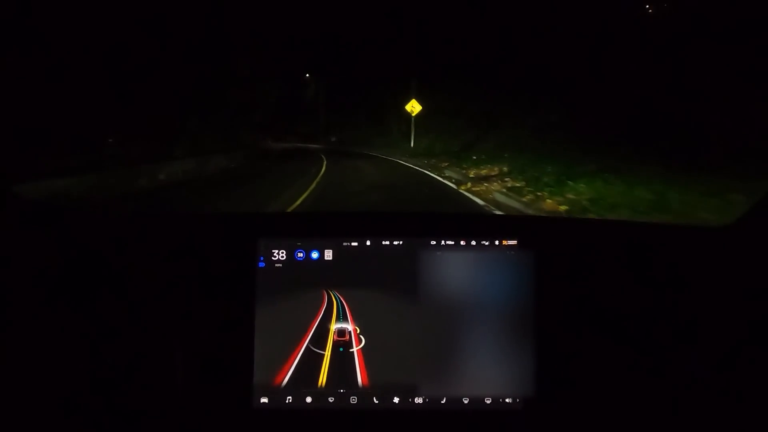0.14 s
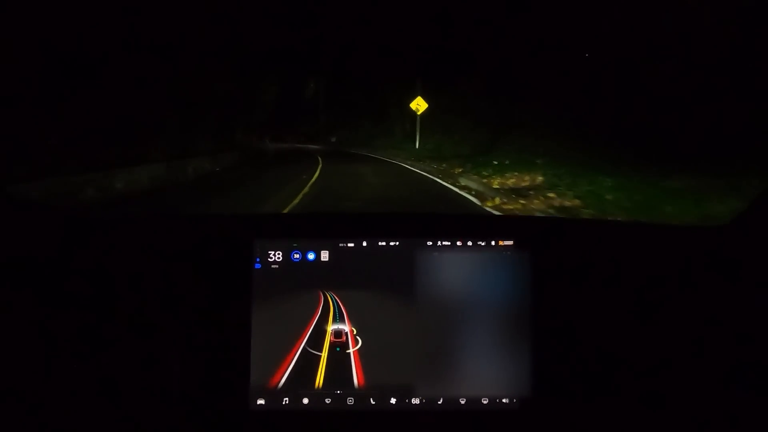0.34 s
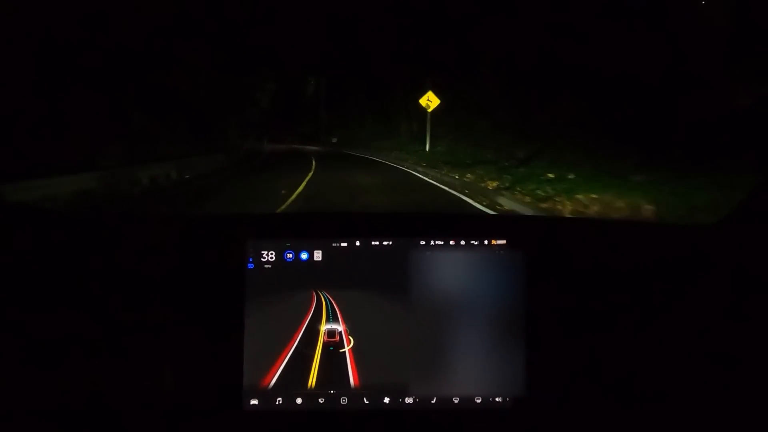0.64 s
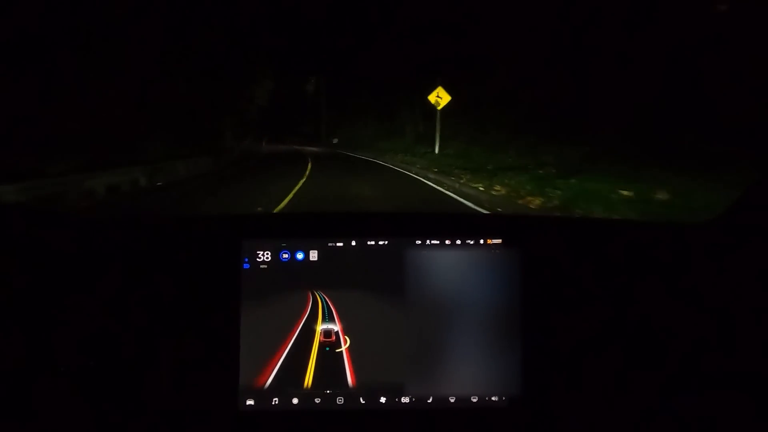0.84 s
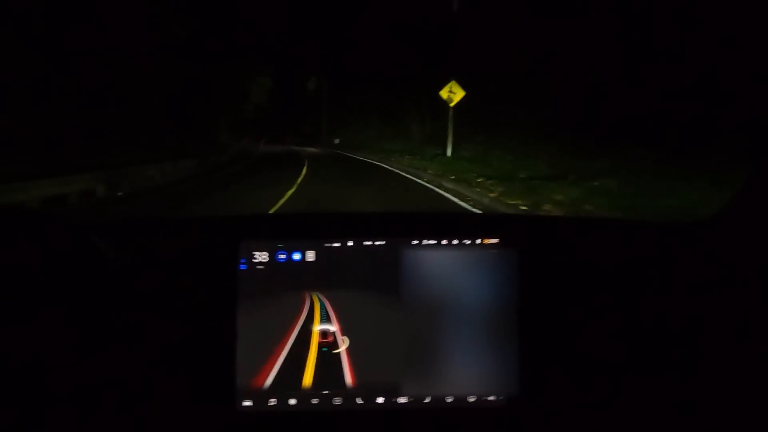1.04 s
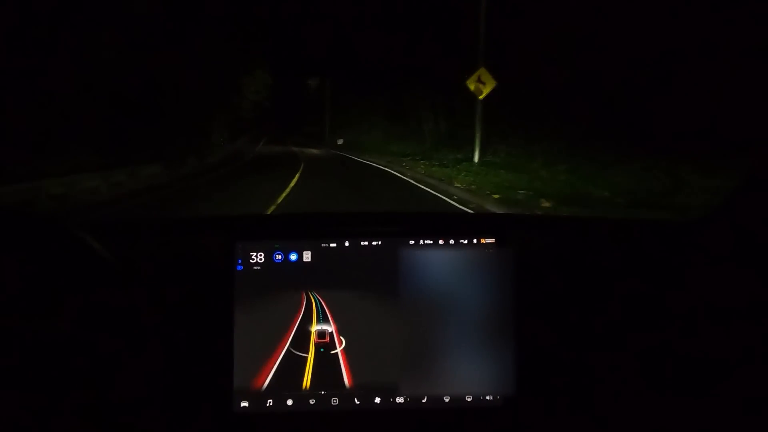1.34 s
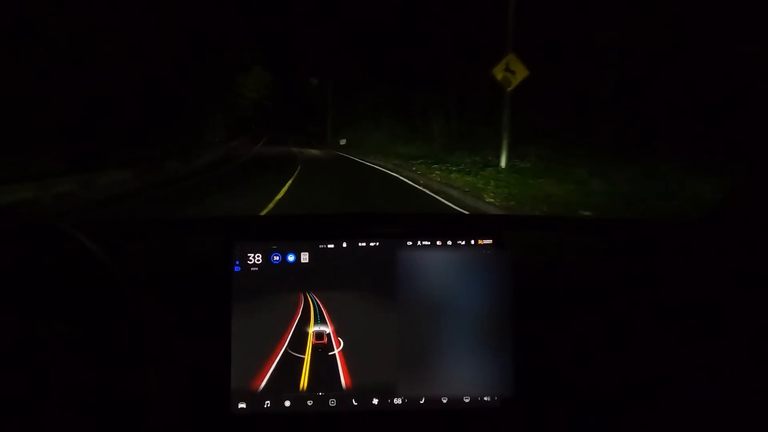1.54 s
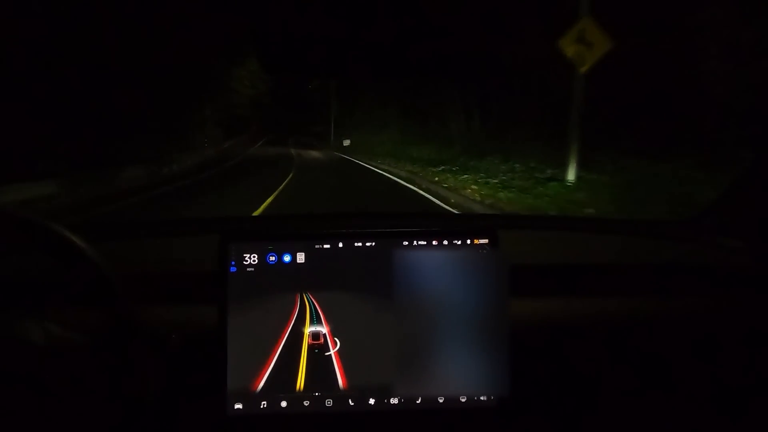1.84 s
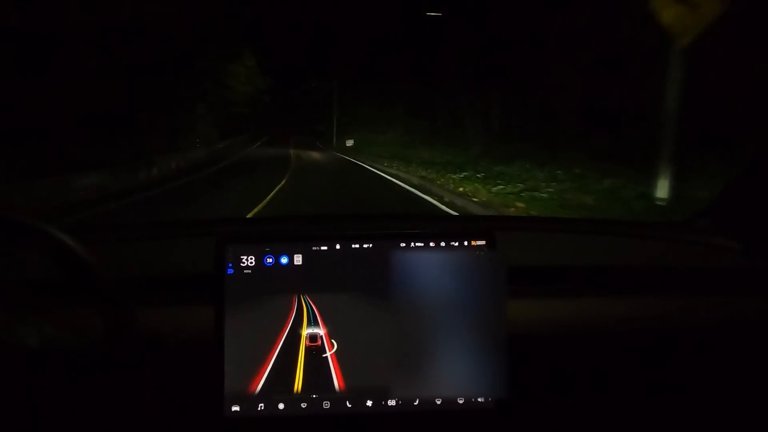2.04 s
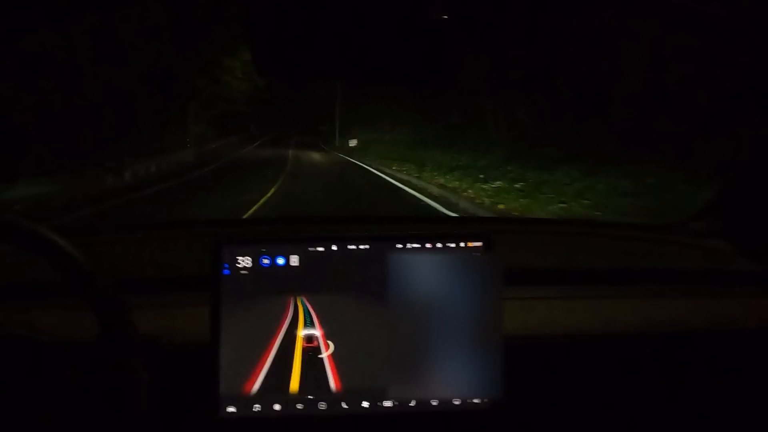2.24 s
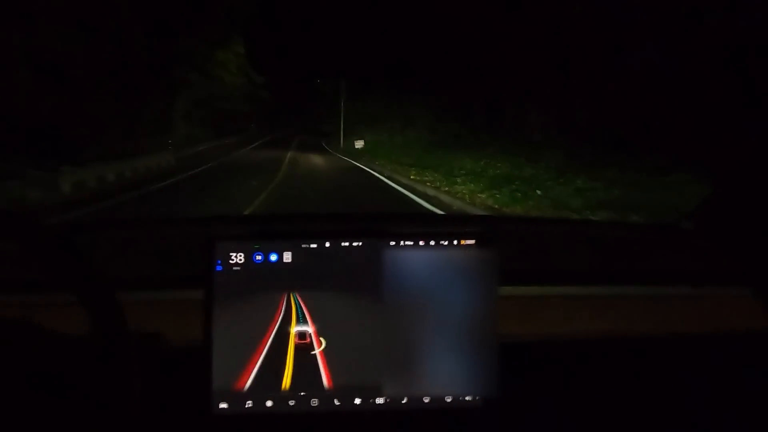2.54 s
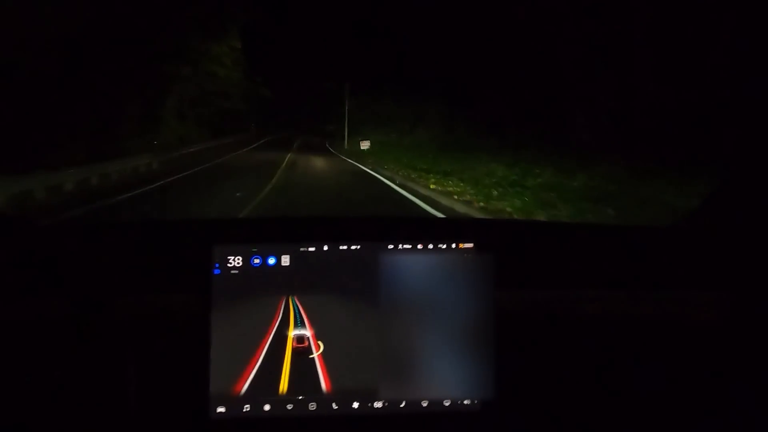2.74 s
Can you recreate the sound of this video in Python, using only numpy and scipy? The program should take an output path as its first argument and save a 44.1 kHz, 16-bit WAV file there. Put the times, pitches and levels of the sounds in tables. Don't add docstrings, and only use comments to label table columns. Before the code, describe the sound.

Continuous low tyre and road rumble inside a quiet electric car, dark and boomy, with a barely audible motor tone and faint airy hiss. Around 1.1 to 1.3 s, grit and wet leaves spit sharply into the wheel arch, and the rumble then dips. Bumps boom again near 2.2 s; from 2.4 to 2.65 s a stronger gritty rattle peaks with a heavy hollow knock at 2.57 s, then subdued rumble.

```python
import sys
import numpy as np
from scipy import signal
from scipy.fft import rfft, irfft
from scipy.io import wavfile
from scipy.ndimage import uniform_filter1d, minimum_filter1d

SR = 44100
rng = np.random.default_rng(int(sys.argv[2]) if len(sys.argv) > 2 else 0)


def master(y):
    cut = np.clip(np.atleast_2d(y).T, -1, 1)
    pcm = np.round(cut * 32767)
    wavfile.write(sys.argv[1], SR, pcm.astype(np.int16))


def invert_db(x):
    u = np.asarray(x, float) / 20
    return 10 ** u


N = 127890

# time in seconds, gain in dB.
ROAD_GAIN = [(0, 1.5), (.9, 1), (1.15, 1.5), (1.3, -2), (1.5, -5.5), (1.85, -4), (2.249, -1.5), (2.45, -1),
             (2.62, -7), (2.75, -7), (2.9, -6.5)]
# time in seconds, rumble lift in dB.
RUMBLE_LIFT = [(0, 1), (.15, -1.5), (.4, -2), (.55, 0.5), (.75, -0.5), (.9, 0), (1.05, -1.5), (1.2, -0.5),
               (1.35, -3.5), (1.65, 1), (1.9, -0.5), (2.15, 0), (2.351, -1), (2.72, 2), (2.9, -3)]
# frequency in Hz, density in dB per Hz.
RUMBLE = [(7.1, -28.5), (12, -4.5), (32, 5), (118, -3.5), (151, -10.5), (184, -9.5), (231, -15), (375, -24),
          (450, -28), (580, -66.5), (990, -120)]
# frequency in Hz, density in dB per Hz.
ROAR = [(400, 2), (620, -13), (1100, -12), (1970, -30.5), (3500, -40.5), (7400, -55.5), (8300, -74),
        (15000, -85.5)]
RUMBLE_DB, ROAR_DB = -18.5, -43.5
# centre in Hz, width in Hz, lift in dB.
CABIN_MODES = [(52, 3.9, 0), (74, 10, 1.5), (109.7, 10, -0.5), (119.7, 16, 3.5), (183.4, 11, 5),
               (202.8, 18, 5.5), (256, 24, 3.5), (299, 14, 3), (382, 24, 8), (579.8, 26, 9), (764, 44, 9),
               (992, 8.8, 10.5), (1070, 30, 0.5), (1250, 29, 3)]
# centre in seconds, length in seconds, pitch in Hz, level in dB.
SHAKES = [(0.1447, 0.68, 33, -21), (0.55, .4, 27.4, -20), (0.99, 0.45, 33.3, -21), (1.04, 0.21, 38, -19),
          (1.15, .2, 22.8, -15), (1.38, 0.46, 19.84, -14), (1.36, 0.34, 41, -22), (1.9, .4, 34, -19.5),
          (1.6, .3, 24, -27.5), (2.2, 0.28, 29, -17.5), (2.06, .2, 37.8, -22), (2.32, .14, 42, -21),
          (1.6, .25, 40, -25), (2.2, 0.15, 27.9, -14), (2.48, .16, 40, -12), (2.52, .1, 24.8, -20),
          (2.59, 0.23, 34, -12), (2.67, .12, 40, -19), (2.56, .3, 16, -19.5), (2.56, 0.15, 318, -37),
          (1.26, 0.16, 330, -39), (.58, .2, 100, -25.5), (.56, .2, 330, -39), (2.15, 0.17, 195, -29),
          (1.17, 0.14, 200, -30.5), (2.72, .12, 115, -31), (1.24, .1, 95, -24), (.93, 0.23, 215, -30),
          (2.75, 0.39, 18, -21), (.62, .4, 183, -28.5), (.87, 0.22, 120, -26.5), (1.77, .3, 127, -29),
          (2.06, 0.17, 120, -28.5), (2.84, 0.23, 196, -32.5), (.9, .2, 70, -26), (2.3, 0.24, 75, -29)]
# peak in seconds, level in dB, rise in seconds, fall in dB per second.
SHOWERS = [(0.021, -64, 0.006, 499), (.52, -71.5, 0.0072, 404.5), (.95, -68.5, 0.016, 314.5),
           (1.079, -54, 0.003, 883), (1.091, -50, 0.006, 650), (1.151, -62, 0.045, 197.5),
           (1.206, -61.5, .01, 506.5), (1.234, -60.5, 0.0023, 147.5), (1.289, -50.5, 0.055, 309),
           (1.321, -56.5, .02, 137), (1.457, -68.5, 0.0057, 591), (2.211, -71.5, 0.009, 291.5),
           (2.345, -57.5, 0.0043, 214), (2.38, -54.5, 0.031, 103), (2.418, -52, 0.04, 219),
           (2.457, -56.5, 0.009, 243), (2.517, -50.5, 0.012, 150), (2.536, -50.5, 0.009, 157.5),
           (2.571, -46, 0.0062, 207), (2.6, -58.5, 0.024, 126), (2.627, -56.5, 0.0051, 295),
           (2.643, -64, .006, 500), (2.667, -66.5, .002, 901), (2.7, -75, 0.0097, 256),
           (2.869, -66, 0.019, 292)]
# frequency in Hz, density in dB per Hz.
SPRAY_COLOUR = [(300, -11.5), (750, -7), (1400, -11.5), (2600, -21), (4300, -24), (7200, -32.5),
                (9500, -47.5), (15000, -71.5)]
GRAINS_PER_S, GRAIN_SPREAD_DB, GRAIN_CYCLES = 9000, 2.5, 3.5
SPRAY_DB, WASH_SHARE, ECHO_DB, CABIN_T60_S = 8, .45, -15, .09
# peak in seconds, level in dB, rise in seconds,
# fall in dB per second, centre in Hz.
CLUMPS = [(1.092, -50, 0.022, 554.5, 2900), (1.289, -48.5, .008, 700, 3010),
          (1.288, -57.5, .007, 700, 6000), (1.29, -44.5, .01, 600, 1500), (2.516, -47.5, .007, 400, 1700),
          (2.42, -62, 0.022, 401, 6500), (2.53, -44.5, 0.014, 300, 1650), (2.562, -35, .02, 354, 333),
          (2.57, -35.5, 0.0036, 800, 845), (1.1, -47.5, .003, 902, 1550), (1.11, -50.5, .008, 799, 2000),
          (1.2, -64, 0.0063, 603, 5800), (2.46, -54, .008, 600, 2600), (2.53, -51.5, 0.016, 398, 3300),
          (2.552, -49, .01, 500, 1600), (2.575, -52.5, 0.0055, 400.5, 4300), (2.412, -49.5, .01, 499, 1700),
          (2.6, -52, .012, 299, 2100), (2.605, -38, 0.011, 300, 352)]
# start in seconds, pitch in Hz, level in dB, T60 in seconds.
KNOCKS = [
    (1.077, 1900, -41, .03),
    (1.289, 1500, -42, .03),
    (2.409, 1150, -38, .04),
    (2.567, 760, -29, .04),
    (2.568, 1050, -33, .03),
]
WHINE_HZ, WHINE_DB = 2112, -79
# centre in seconds, length in seconds, level in dB, top in Hz.
HISS_SWELLS = [
    (0.147, 0.33, -86.5, 10000),
    (.72, .4, -87.5, 11500),
    (2.2, .4, -94.5, 8530),
]
# frequency in Hz, correlation from 0 to 1.
LIKENESS = [(60, 0.96), (150, 1), (380, 0.93), (950, 0.79), (2380, 0.57), (5980, 0.2), (15000, 1)]
# frequency in Hz, left minus right in dB.
LEAN = [(60, -1), (150, -0.5), (380, -2), (950, -4.5), (2380, -4.5), (5980, -3), (15000, -1)]
# frequency in Hz, lead of the left in radians.
LEAD = [(100, 0), (500, .15), (1200, .5), (2100, 0.8), (5000, 0.46), (9000, 0.065)]
# start in seconds, length in seconds, direction as +1 or -1.
STEP_RUNS = [(.19, .018, 1), (.215, .012, -1), (.272, .012, 1), (.375, .02, -1), (1.122, .04, -1),
             (1.254, .03, -1), (1.31, .05, -1), (1.372, .04, 1), (1.546, .016, 1), (1.685, .024, 1),
             (1.731, .008, -1), (1.832, .014, 1), (1.898, .014, -1), (2.13, .014, 1), (2.314, .022, -1),
             (2.61, .085, -1), (2.71, .03, 1), (2.79, .012, -1)]
STEP_S, STEP_DB = 1 / 375, .07
CEILING_DB, SQUEEZE = -10, .39
FADE_S = .004


def read(points, hz):
    f, value = np.transpose(points)
    return np.interp(np.log(hz + 1), np.log(f + 1), value)


def evened(x):
    return x / np.sqrt(np.mean(x ** 2) + 1e-20)


def colour(x, gain):
    return irfft(rfft(x) * gain(np.fft.rfftfreq(N, 1 / SR)), N)


def high_pass(hz, corner, order):
    return 1 / (1 + (corner / (hz + 1)) ** order)


def swell(t, centre, length):
    return np.cos(np.pi * np.clip((t - centre) / length, -.5, .5))


def cabin_db(hz):
    return sum(db / (1 + (2 * (hz - f) / width) ** 2) for f, width, db in CABIN_MODES)


def patchy(x, patch_db, flicker_db):
    z = signal.stft(x, nperseg=512)[2]
    field = rng.standard_normal(z.shape[1:])
    field = uniform_filter1d(field, size=6, axis=0)
    patches = evened(uniform_filter1d(field, size=10, axis=1))
    flicker = evened(uniform_filter1d(rng.standard_normal(z.shape[2]), size=3))
    z = z * invert_db(patch_db * patches + flicker_db * flicker)
    return signal.istft(z, nperseg=512)[1][:, :N]


def road():
    def rumble_gain(hz):
        low_pass = 1 / (1 + (hz / 430) ** 12)
        return invert_db(read(RUMBLE, hz) + cabin_db(hz)) * low_pass * high_pass(hz, 22, 4)

    def roar_gain(hz):
        return invert_db(read(ROAR, hz) + cabin_db(hz)) * high_pass(hz, 430, 12)

    t = np.arange(N) / SR
    rumble = colour(rng.standard_normal((2, N)), rumble_gain)
    roar = colour(rng.standard_normal((2, N)), roar_gain)
    rumble = evened(patchy(rumble, patch_db=0.88, flicker_db=-1.0))
    roar = evened(patchy(roar, patch_db=1.0, flicker_db=0.3))
    gain = invert_db(np.interp(t, *np.transpose(ROAD_GAIN)))
    lift_db = np.interp(t, *np.transpose(RUMBLE_LIFT))
    return gain * (invert_db(RUMBLE_DB + lift_db) * rumble + invert_db(ROAR_DB) * roar)


def shakes():
    t, out = np.arange(N) / SR, np.zeros(N)
    for centre, length, hz, db in SHAKES:
        phase = rng.random()
        wander = .03 * min(hz, 60) / 3 * np.sin(2 * np.pi * (6 * t + 7 * phase))
        tone = np.sin(2 * np.pi * (hz * (t - centre) + phase) + wander)
        out += invert_db(db) * np.sqrt(2) * swell(t, centre, length) * tone
    return out * invert_db(np.array([[-.3], [.3]]))


def shower(peak, db, rise, fall):
    t = np.arange(N) / SR
    return invert_db(db - np.where(t < peak, 20 * ((peak - t) / rise) ** 2, fall * (t - peak)))


def grit():
    size = invert_db(GRAIN_SPREAD_DB * np.minimum(rng.exponential(1, N), 5))
    size = size * (rng.random(N) < GRAINS_PER_S / SR)
    size = size * rng.choice([-1., 1.], (2, N))
    kind = rng.integers(0, 24, size=N)
    t, grains = np.arange(1024) / SR, np.zeros((2, N))
    for k, hz in enumerate(np.geomspace(400, 13000, num=24)):
        u = hz * t / GRAIN_CYCLES
        grain = hz * u * np.exp(-4 * u) * np.sin(2 * np.pi * hz * t)
        grains += signal.oaconvolve(size * (kind == k), grain[None], axes=1)[:, :N]
    return grains


def spray():
    power = sum(shower(*row) ** 2 for row in SHOWERS)
    drive = (1 - WASH_SHARE) * evened(grit()) + WASH_SHARE * rng.standard_normal((2, N))
    drive = colour(drive, lambda hz: invert_db(read(SPRAY_COLOUR, hz)) * high_pass(hz, 300, 4))
    wet = evened(drive) * np.sqrt(power)
    echo = np.zeros((2, N))
    delays = np.geomspace(.002, CABIN_T60_S, num=40)
    for delay, sign in zip(delays, rng.choice([-1., 1.], (40, 2, 1))):
        n = round(delay * SR)
        echo[:, n:] += sign * invert_db(-40 * delay / CABIN_T60_S) * wet[:, :-n]
    return invert_db(SPRAY_DB) * (wet + invert_db(ECHO_DB) * echo)


def clumps():
    out = np.zeros((2, N))
    for *envelope, centre_hz in CLUMPS:
        puff = colour(rng.standard_normal((2, N)),
                      lambda hz: np.exp(-(np.log((hz + 1) / centre_hz) / .4) ** 2))
        out += shower(*envelope) * evened(puff)
    return out


def knock():
    out = np.zeros(N)
    for start, hz, db, t60 in KNOCKS:
        t = np.maximum(np.arange(N) / SR - start, 0)
        onset = np.minimum(t * hz / 2, 1)
        out += invert_db(db - 60 * t / t60) * onset * np.sin(2 * np.pi * hz * t)
    return out * invert_db(np.array([[-3], [2]]))


def whine():
    strength, pitch = evened(uniform_filter1d(rng.standard_normal((2, N)), size=3000))
    phase = 2 * np.pi * np.cumsum(WHINE_HZ + 4.9 * pitch) / SR
    return invert_db(WHINE_DB + 2.6 * strength) * np.sin(phase)


def top_hiss():
    t, noise = np.arange(N) / SR, rng.standard_normal((2, N))
    out = np.zeros((2, N))
    for centre, length, db, top_hz in HISS_SWELLS:
        hiss = colour(noise, lambda hz: high_pass(hz, 7000, 16) / (1 + (hz / top_hz) ** 16))
        out += invert_db(db) * swell(t, centre, length) * evened(hiss)
    return out


def ports(pair):
    padded = np.pad(pair, ((0, 0), (4096, 4096)), "reflect")
    a, b = rfft(padded * signal.windows.tukey(N + 8192, 4096 / N))
    hz = np.fft.rfftfreq(N + 8192, 1 / SR)
    same = np.clip(read(LIKENESS, hz) + (hz < 90), 0, .997)
    lean = invert_db(read(LEAN, hz) / 2)
    left = a * lean * np.exp(1j * read(LEAD, hz))
    right = (same * a + np.sqrt(1 - same ** 2) * b) / lean
    return irfft(np.array([left, right]))[:, 4096:N + 4096]


def scene():
    return ports(road() + spray() + clumps() + top_hiss()) + shakes() + knock() + whine()


def top_cut(x):
    return signal.sosfilt(signal.butter(12, 15710, fs=SR, output="sos"), x)


def record(dry):
    peak = -minimum_filter1d(-abs(dry).max(0), size=1200)
    level_db = 20 * np.log10(peak + 1e-6)
    cut_db = uniform_filter1d(np.maximum(level_db - CEILING_DB, 0), size=1200)
    t = np.arange(N) / SR
    block = (t / STEP_S).astype(int)
    at = np.arange(block[-1] + 1) * STEP_S
    steps = sum(way * (at >= start) * (at < start + length) for start, length, way in STEP_RUNS)
    steps = steps * (rng.random(len(at)) < .9)
    stairs_db = STEP_DB * np.cumsum(steps)[block]
    stairs_db = stairs_db - uniform_filter1d(stairs_db, size=4000)
    fade = np.sin(np.pi / 2 * np.minimum(t[::-1] / FADE_S, 1)) ** 2
    return top_cut(fade * dry / invert_db(SQUEEZE * cut_db + stairs_db))


dry = scene()
out = record(dry)
master(out)
```